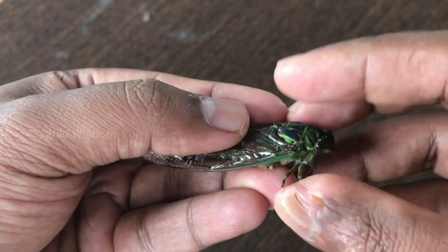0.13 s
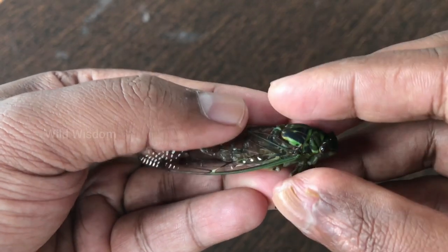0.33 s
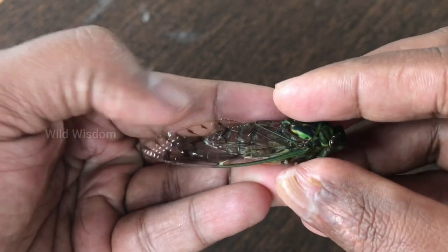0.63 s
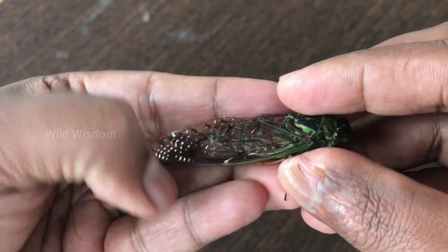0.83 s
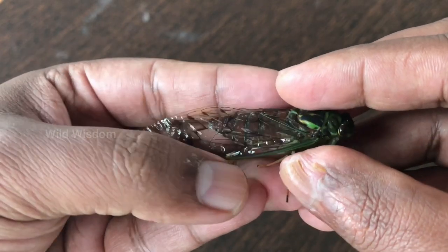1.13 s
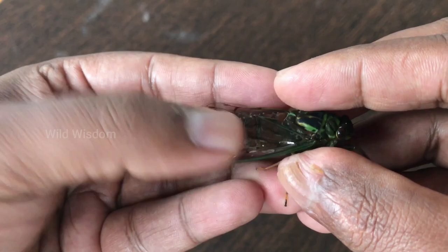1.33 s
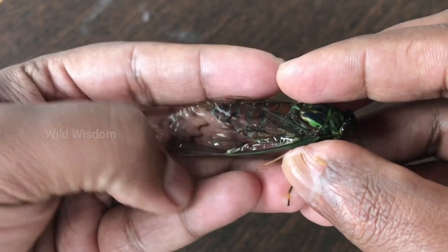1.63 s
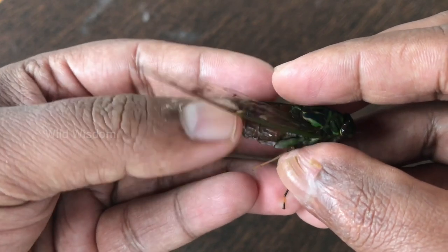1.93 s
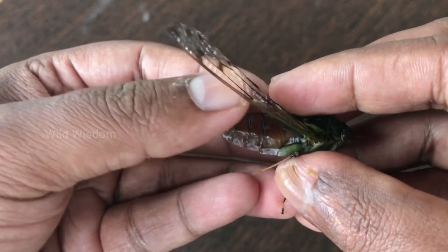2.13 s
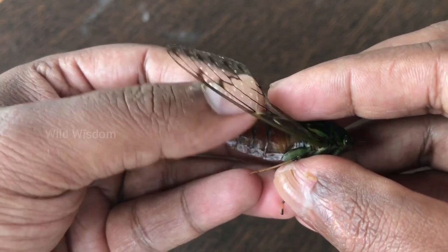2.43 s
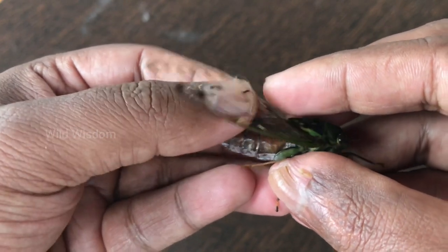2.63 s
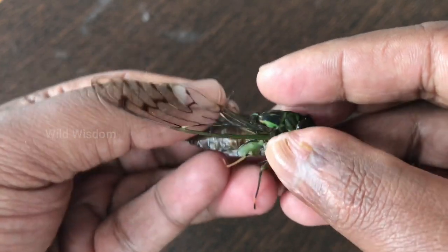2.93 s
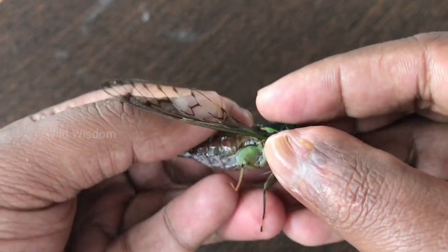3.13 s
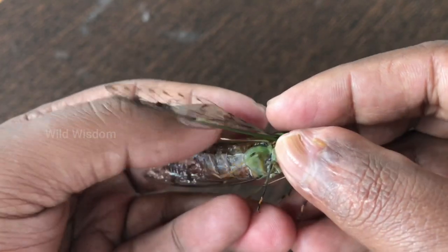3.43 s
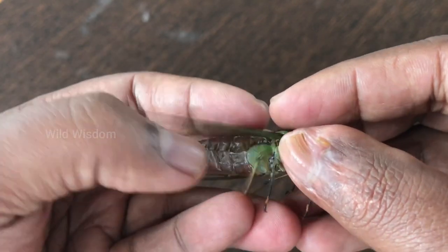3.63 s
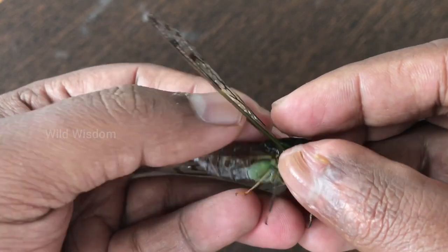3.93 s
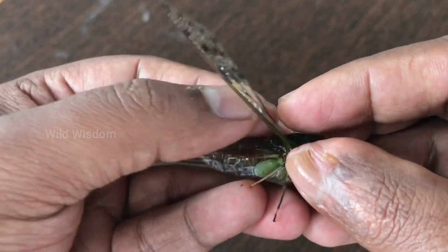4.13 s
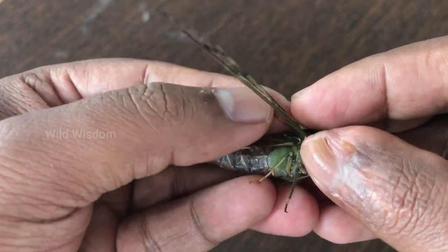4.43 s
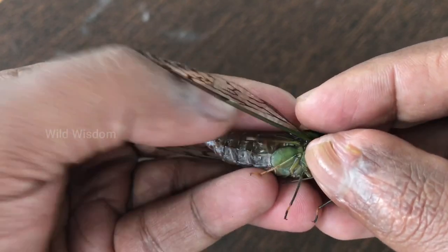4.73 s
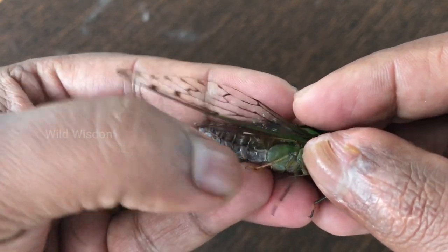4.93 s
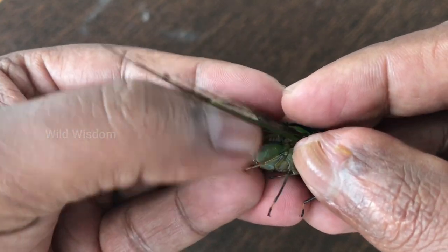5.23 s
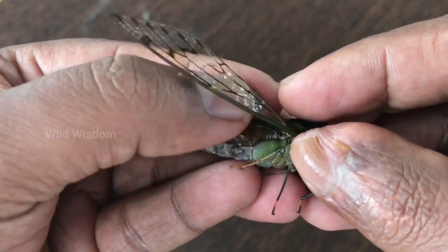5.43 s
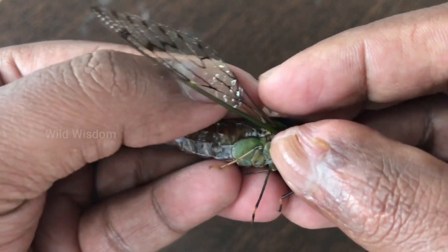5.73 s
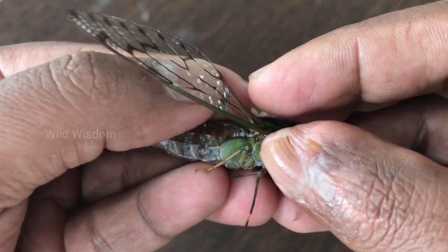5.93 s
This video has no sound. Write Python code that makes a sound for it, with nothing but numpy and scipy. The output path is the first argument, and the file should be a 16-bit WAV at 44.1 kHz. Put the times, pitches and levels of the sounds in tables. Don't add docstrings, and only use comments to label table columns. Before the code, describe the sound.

Faint fingertip ticks on papery wings, sparse sharp insect clicks, then loud stuttering cicada buzzing that fades out above a quiet room hum.

```python
import sys
import numpy as np
from scipy import signal
from scipy.fft import rfft, irfft
from scipy.io import wavfile

SR = 44100
rng = np.random.default_rng(int(sys.argv[2]) if len(sys.argv) > 2 else 0)


def store_wav(level_fs):
    pcm = np.round(np.clip(np.atleast_2d(level_fs), -1, 1) * 32767)
    wavfile.write(sys.argv[1], SR, pcm.T.astype(np.int16))


def attenuation_scalar(level_db):
    decades = np.asarray(level_db, float) / 20
    return 10 ** decades


N = 268877

# rise in ms, fall in ms, delay of the last ribs in ms, their fall in ms,
# drum pitch in Hz, slack drum pitch in Hz, drum lag in ms, drum fall in ms, crackle lead in ms.
NEAR_STROKE = (.55, .6, 1.5, .9, 4650, 4000, -.2, .85, .45)
FAR_STROKE = (.62, .65, 1.9, .8, 4500, 4350, -.1, .8, .1)
# first stroke in seconds, last in seconds, number of strokes,
# abdomen level in dB.
NEAR_RUNS = [(3.4096, 3.4359, 3, -16.6), (3.4474, 3.4702, 3, -16.1), (3.55, 3.5759, 3, -15.9),
             (3.636, 3.6919, 5, -16.0), (3.7216, 3.7659, 5, -16.4), (4.1514, 4.1758, 3, -13.5),
             (4.1871, 4.2548, 7, -14.2), (4.2683, 4.2798, 2, -14.2), (4.294, 4.3073, 2, -14.5),
             (4.3199, 4.3199, 1, -16.5), (4.3274, 4.3274, 1, -14.2), (4.3887, 4.4131, 3, -16.4),
             (4.4255, 4.4587, 4, -14.8), (4.472, 4.5097, 4, -15.6), (4.5888, 4.6034, 2, -24.3),
             (4.6151, 4.6376, 3, -23.7), (4.6518, 4.6518, 1, -23.6), (4.6837, 4.7229, 4, -20.8),
             (4.7585, 4.7839, 3, -20.6), (4.7947, 4.8625, 7, -20.0), (4.8802, 4.9434, 6, -20.4),
             (4.9606, 4.9606, 1, -20.9), (5.0057, 5.0425, 4, -22.9), (5.1985, 5.2221, 3, -23.0)]
FAR_RUNS = [(3.4048, 3.4193, 2, -16.6), (3.4303, 3.464, 4, -15.3), (3.5445, 3.5813, 4, -18.1),
            (3.6439, 3.6845, 4, -17.2), (3.7158, 3.7291, 2, -15.1), (3.74, 3.7715, 4, -15.4),
            (4.1553, 4.1928, 4, -14.5), (4.2037, 4.2491, 5, -14.6), (4.2594, 4.317, 5, -14.5),
            (4.3344, 4.3344, 1, -14.2), (4.3931, 4.4186, 3, -16.5), (4.4305, 4.4884, 6, -15.5),
            (4.5027, 4.5027, 1, -16.5), (4.5848, 4.6427, 6, -25.6), (4.69, 4.7145, 3, -21.6),
            (4.7291, 4.7291, 1, -22.0), (4.755, 4.8545, 10, -22.3), (4.8674, 4.8674, 1, -22.5),
            (4.8842, 4.9362, 5, -23.0), (4.9568, 4.9568, 1, -23.0), (5.0105, 5.0476, 4, -24.0),
            (5.201, 5.2149, 2, -24.0)]
# start in seconds, abdomen level in dB, drum level in dB, rib crackle in dB.
NEAR_CLICKS = [
    (3.0209, -15.5, -28.0, -35.3),
    (3.4994, -16.8, -13.8, -23.7),
    (3.5208, -17.8, -17.9, -26.5),
    (4.0479, -13.8, -16.8, -25.3),
    (4.0976, -13.2, -16.8, -21.6),
    (4.1371, -15.2, -18.6, -28.5),
    (4.9849, -23.8, -30.9, -19.4),
    (5.4553, -23.8, -24.3, -27.6),
]
FAR_CLICKS = [(1.2282, -19.2, -28.2, -39.8), (2.5845, -20.8, -27.2, -37.2), (3.1762, -14.6, -19.3, -33.0),
              (3.2632, -16.0, -16.0, -31.1), (3.2953, -15.3, -16.1, -29.7), (3.3367, -17.4, -18.9, -33.3),
              (3.3743, -18.4, -21.6, -36.3), (4.058, -15.5, -22.8, -32.8), (4.1017, -13.8, -19.6, -30.9),
              (5.113, -25.3, -25.6, -30.7), (5.4511, -21.7, -27.5, -29.3), (5.4726, -21.8, -23.3, -30.3),
              (5.6118, -22.3, -28.6, -31.9)]
# time in seconds,
# pose (0 limp, 1 waking, 2 tense, 3 open, 4 pinched by the thumb, 5 tired).
POSTURE = [
    (1.2, 0.0),
    (2.6, 0.6),
    (3.0, 1.0),
    (3.2, 1.9),
    (3.385, 2.0),
    (3.42, 3.0),
    (4.53, 3.0),
    (4.575, 4.0),
    (5.06, 4.0),
    (5.45, 5.0),
]
# abdomen pitch in Hz, last ribs' pitch in Hz,
# last ribs' level in dB, snap-back delay in ms, snap-back level in dB.
NEAR_POSES = [(2140, 2100, -20, 3.2, -22), (2250, 1600, -12, 3.08, -20), (2300, 1880, -8, 2.8, -24),
              (2416, 1710, -7.5, 3.3, -23.5), (2250, 1800, -6, 3.3, -18.5)]
FAR_POSES = [(1970, 2300, -8, 4.5, -17.5), (2100, 2300, -12, 3.6, -20), (2245, 2520, -7.5, 3.6, -23.5),
             (2305, 1840, -11.5, 3.0, -23.5), (2290, 1606, -4, 3.5, -19.5), (2300, 2000, -6.5, 3.0, -19.5)]
# warm drum level in dB, added when cold in dB,
# rib crackle relative to the abdomen in dB.
NEAR_VOICE = [(-8, -4, -9.5), (-15.5, 0, 1), (-22, -2, -1.5)]
FAR_VOICE = [(-7.3, -4, -14), (-11, -0.5, -2), (-7, -6, 1)]
BELLY_NOISE = [(1.4,), (-3.5,), (.1,)]
# pitch in Hz, level in dB.
RIB_RING = [(12900, -5.5), (13800, -3), (15400, -7), (16150, -1)]
# frequency in Hz, width in Hz, level in dB.
BELLY_MODES = [(1406, 156, -1), (3116, 160, -8), (3744, 470, 2)]
RIB_MODES = [(5200, 250, -28), (6600, 1700, -3.5), (7570, 160, 2.5), (8200, 1100, -8.5), (10100, 930, -4),
             (11070, 700, -5.5), (13000, 650, -3.5), (14000, 350, -9), (15300, 700, 0), (16000, 500, -7)]
NEAR_SNAP = [(2300, 440, -12.5), (4890, 490, 3.5), (6330, 320, 2.5), (7040, 270, 2), (9630, 480, -4.5),
             (12300, 1000, -5.5), (14100, 790, -8), (16000, 900, -2)]
FAR_SNAP = [(2300, 550, -3), (3780, 1100, -7.5), (4730, 630, 4), (6480, 400, -2), (7200, 310, -4.5),
            (8540, 600, -9), (10840, 930, -6), (12700, 740, -10.5), (14200, 900, -8), (16100, 900, -14)]
# frequency in Hz, width in Hz, depth in dB.
WING_SHADOW = (14650, 300, -7)
# start in seconds, peak level in dB, pitch in Hz.
TICKS = [(0.4534, -41.5, 8640), (1.0979, -44, 9770), (1.1218, -39, 12900), (1.143, -34, 13500),
         (1.1504, -35.5, 10800), (1.1864, -31, 12900), (1.193, -34, 9240), (1.2505, -38, 10100),
         (1.7094, -42, 11600), (1.8542, -36, 12100), (1.8976, -29, 10800), (1.9004, -26, 8640),
         (1.9034, -33, 11500), (1.9205, -37, 15000), (1.9504, -32.5, 15400), (1.9764, -37, 9690),
         (2.0243, -36.5, 8620), (2.2283, -49, 8070), (2.4443, -44, 13100), (2.5304, -37, 13000),
         (2.6633, -37, 9800), (2.7432, -44, 15000), (2.8025, -47, 13200), (2.8534, -41, 14400),
         (2.8654, -40, 16000), (2.9203, -41, 8250), (2.934, -31, 15000), (3.145, -31, 7440),
         (3.9975, -33, 7990), (5.5265, -33, 8250)]
# moment of letting go in seconds, build-up in seconds, level in dB.
DRAGS = [(1.146, 0.027, -53), (1.19, 0.0081, -52), (1.245, 0.019, -51), (1.65, .03, -61), (1.8, .12, -64),
         (1.99, .07, -63), (2.026, .007, -54), (2.48, .1, -66), (2.534, .006, -46), (2.668, .025, -59),
         (2.87, .07, -63), (2.94, 0.031, -62), (3.98, .05, -64), (4.004, .009, -49), (5.55, .04, -62),
         (5.622, .003, -50)]
# frequency in Hz, density in dB per Hz.
AIR = [(20, -29), (58, -1), (265, -3.5), (330, -10.5), (593, -16.5), (1460, -15), (6030, -29),
       (17000, -46.5)]
# frequency in Hz, width in Hz, height in dB.
FAN = [(64.5, 28, 5.5), (115, 14, 2.5), (185.7, 51.5, 8), (279.4, 15.2, 9.5), (620, 86, 7.5),
       (933, 143, 5.5), (1437, 14, 10)]
# frequency in Hz, width in Hz, depth in dB.
MIC_DIPS = [(4940, 390, -5.5), (7530, 750, -2), (10780, 390, -7)]

WARM_UP_S = 0.028
DRUM_FOLLOWS = 0.42
PAUSE_S = .025
LEAD_S = .003
KNOCK_DB, KNOCK_GROWTH = -45.5, 1.5
LET_GO = 0.52
AIR_DB, DUCK_FROM_DB, DUCK_SHARE, DUCK_S = -40.5, -31.5, 0.55, .2
ROOM_T60_S, ROOM_DB, ROOM_CUT_HZ = 2.2, -29.5, 7100
HISS_DB = -66
CUTOFF_HZ, PEAK_LIMIT = 16530, .68


def cicada():
    near = drum(strokes(NEAR_RUNS, NEAR_CLICKS, NEAR_VOICE), NEAR_STROKE, NEAR_POSES)
    far = drum(strokes(FAR_RUNS, FAR_CLICKS, FAR_VOICE), FAR_STROKE, FAR_POSES)
    tone, shake, rattle = near[:3] + far[:3]
    noisy = resonate(shake, BELLY_MODES) + resonate(rattle, RIB_MODES)
    noisy += resonate(near[3], NEAR_SNAP) + resonate(far[3], FAR_SNAP)
    body = tone + filtered(noisy, 2, 1150, "high")
    return dip(body, *WING_SHADOW)


def drum(rows, stroke, poses):
    rise, fall, tail_ms, tail_fall, drum_hz, slack_hz, drum_lag, drum_fall, crackle_lead = stroke
    luck = rng.standard_normal((9, len(rows), 1))
    time_luck, pitch_luck, level_luck, skin_pitch_luck, phase_luck = luck[:5]
    skin_luck, snap_time_luck, snap_luck, tail_luck = luck[5:]
    s = rows[:, 0] + .00014 * time_luck[:, 0]
    abdomen_db, skin_db, crackle_db = rows[:, [1]], rows[:, [2]], rows[:, [3]]
    main_hz, tail_hz, tail_db, snap_ms, snap_db = np.array(in_pose(poses, s))[:, :, None]
    ms = np.arange(440) / SR * 1000 - 1000 * LEAD_S
    peak = [round(LEAD_S * SR)]

    late = 1 / (1 + np.exp((0.57 * tail_ms - ms) / 0.058))
    abdomen_hz = (main_hz + (tail_hz - main_hz) * late) * (1 + 0.022 * pitch_luck)
    phase = 2 * np.pi * np.cumsum(abdomen_hz, axis=1) / SR
    phase -= phase[:, peak]
    lobes = swell(ms, rise, fall) + attenuation_scalar(tail_db + tail_luck) * swell(ms - tail_ms, 0.41, tail_fall)
    abdomen = attenuation_scalar(abdomen_db + 2.0 + .5 * level_luck) * lobes * np.cos(phase)

    tension = (main_hz / 2300) ** .7
    skin_hz = (drum_hz + (slack_hz - drum_hz) * late) * tension * (1 + 0.013 * skin_pitch_luck)
    turn = 2 * np.pi * np.cumsum(skin_hz, axis=1) / SR
    turn += 1.2 + .3 * phase_luck - turn[:, peak]
    skin = attenuation_scalar(skin_db + 2.5 + 0.24 * skin_luck) * swell(ms - drum_lag, rise, drum_fall) * np.cos(turn)

    starts = rng.uniform(0, 2 * np.pi, (len(RIB_RING), 1, 1))
    starts = starts + .5 * rng.standard_normal((len(RIB_RING), len(rows), 1))
    zing = 0
    for (hz, db), start in zip(RIB_RING, starts):
        zing = zing + attenuation_scalar(db) * np.cos(2 * np.pi * hz * ms / 1000 + start)
    zing = zing * attenuation_scalar(crackle_db + 1.5) * swell(ms + crackle_lead, .3, .4)

    spurts = swell(ms, 1.0, 1.83) * rng.standard_normal(phase.shape) * (1 + 0.59 * np.cos(phase))
    shake = attenuation_scalar(abdomen_db - 3.5 + in_pose(BELLY_NOISE, s)[0][:, None]) * spurts
    rattle = attenuation_scalar((abdomen_db + crackle_db) / 2 - 3.0) * spurts

    out = ms - snap_ms + .3 - .08 * snap_time_luck
    crackle = swell(out, .12, .75) * rng.standard_normal(phase.shape)
    snap = attenuation_scalar(snap_db + 10.0 + 1.4 * snap_luck) * (3 * swell(out, .012, .012) + .6 * crackle)
    return np.array([lay(part, s - LEAD_S) for part in (abdomen + skin + zing, shake, rattle, snap)])


def strokes(runs, clicks, voice):
    buzz = [(s, db) for first, last, n, db in runs for s in np.linspace(first, last, n)]
    s, db = np.transpose(buzz)
    after_pause = np.diff(s, prepend=0) > PAUSE_S
    since = s - np.maximum.accumulate(s * after_pause)
    warm_db, cold_db, crackle_db = in_pose(voice, s)
    drum_db = DRUM_FOLLOWS * db + warm_db + cold_db * np.exp(-since / WARM_UP_S)
    return np.vstack([clicks, np.transpose([s, db, drum_db, db + crackle_db])])


def in_pose(poses, s):
    first = POSTURE[-1][1] + 1 - len(poses)
    numbered = [(first + k, *row) for k, row in enumerate(poses)]
    return in_time(numbered, in_time(POSTURE, s)[0])


def fingers():
    s, db, hz = np.transpose(TICKS)
    ms = np.arange(300) / SR * 1000
    noise = rng.standard_normal((len(s), len(ms)))
    ring = .5 * np.sin(2 * np.pi * hz[:, None] * ms / 1000)
    ticks = lay(attenuation_scalar(db[:, None] - 3.0) * swell(ms - 1, 0.39, 0.69) * (ring + noise), s)
    knock_db = KNOCK_DB + KNOCK_GROWTH * (db + 32.5)
    thumps = lay(attenuation_scalar(knock_db[:, None] + 19.0) * swell(ms - 1, 0.027, 0.026), s)
    knocks = resonate(thumps, [(3030, 370, 3.4), (5760, 550, 0.054)])
    t = np.arange(N) / SR
    level = sum(attenuation_scalar(drag_db + 2.5) * swell(t - at, build, LET_GO * build) for at, build, drag_db in DRAGS)
    clumps = attenuation_scalar(5.8 * np.repeat(rng.standard_normal(N // 128 + 1), 128)[:N])
    drag = level * rms_one(clumps * rng.standard_normal(N))
    return knocks + filtered(ticks + drag, 2, [7500, 15500], "band")


def room(x):
    t = np.arange(SR) / SR
    tail = rng.standard_normal(SR) * attenuation_scalar(-60 * t / ROOM_T60_S) * np.clip((t - .004) / 0.028, 0, 1)
    tail = filtered(tail, 3, ROOM_CUT_HZ, "low")
    return signal.fftconvolve(x, tail / np.linalg.norm(tail))[:N]


def air(insect):
    hz = np.fft.rfftfreq(N, 1 / SR) + 1
    air_hz, air_db = np.transpose(AIR)
    db = np.interp(np.log(hz), np.log(air_hz), air_db)
    for centre_hz, width_hz, hump_db in FAN:
        db += hump_db / (1 + (2 * (hz - centre_hz) / width_hz) ** 2)
    noise = rms_one(irfft(rfft(rng.standard_normal(N)) * attenuation_scalar(db), N))
    keep = np.exp(-1 / (DUCK_S * SR))
    loudness = signal.lfilter([1 - keep], [1, -keep], insect ** 2) / attenuation_scalar(2 * DUCK_FROM_DB)
    return attenuation_scalar(AIR_DB) * (1 + loudness) ** (-DUCK_SHARE / 2) * noise


def hiss():
    return attenuation_scalar(HISS_DB) * rms_one(filtered(rng.standard_normal(N), 2, 8000, "high"))


def rms_one(x):
    return x / np.sqrt(np.mean(x ** 2) + 1e-20)


def in_time(rows, s):
    t, *columns = np.transpose(rows)
    return [np.interp(s, t, c) for c in columns]


def swell(time, rise, fall):
    return np.exp(-.5 * (time / np.where(time < 0, rise, fall)) ** 2)


def lay(grains, s):
    length = grains.shape[1]
    track = np.zeros(N + length)
    first = np.round(s * SR).astype(int)
    np.add.at(track, first[:, None] + np.arange(length), grains)
    return track[:N]


def filtered(x, order, hz, kind):
    return signal.sosfilt(signal.butter(order, hz, kind, fs=SR, output="sos"), x)


def resonate(x, modes):
    out = 0
    for k, (hz, width_hz, db) in enumerate(modes):
        r = np.exp(-np.pi * width_hz / SR)
        a = [1, -2 * r * np.cos(2 * np.pi * hz / SR), r * r]
        b = [(1 - r * r) / 2, 0, (r * r - 1) / 2]
        out = out + (-1) ** k * attenuation_scalar(db) * signal.lfilter(b, a, x + 1e-18)
    return out


def dip(x, hz, width_hz, db):
    return x - (1 - attenuation_scalar(db)) * resonate(x, [(hz, width_hz, 0)])


def scene():
    insect = cicada()
    return (insect + attenuation_scalar(ROOM_DB) * room(insect) + fingers() + air(insect) + hiss())[None]


def band_limit(x):
    return signal.sosfilt(signal.butter(12, 17660, fs=SR, output="sos"), x)


def record(dry):
    for hz, width_hz, db in MIC_DIPS:
        dry = dip(dry, hz, width_hz, db)
    rounded = PEAK_LIMIT * np.tanh(dry / PEAK_LIMIT)
    top_cut = signal.firwin(901, CUTOFF_HZ, width=180, fs=SR)
    mix = signal.fftconvolve(rounded, [top_cut], "same")
    return band_limit(mix)


dry = scene()
out = record(dry)
store_wav(out)
```